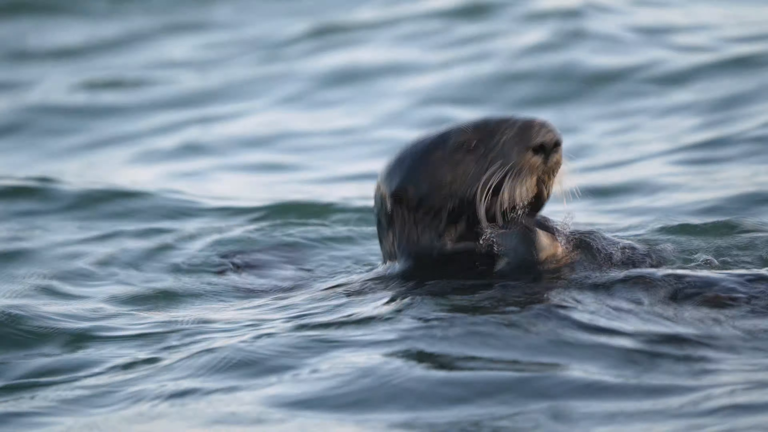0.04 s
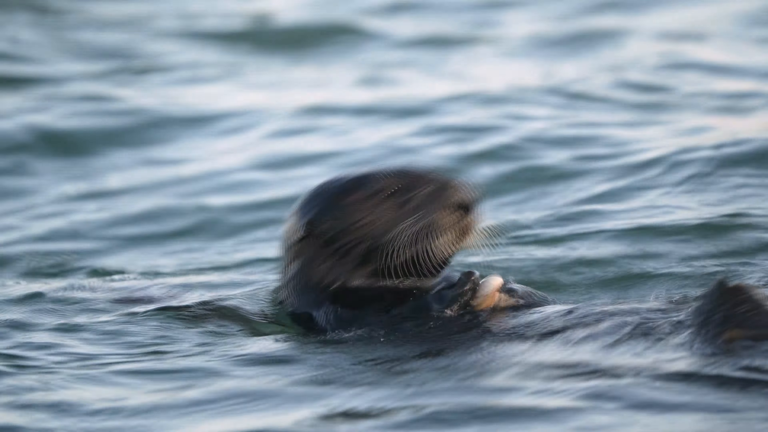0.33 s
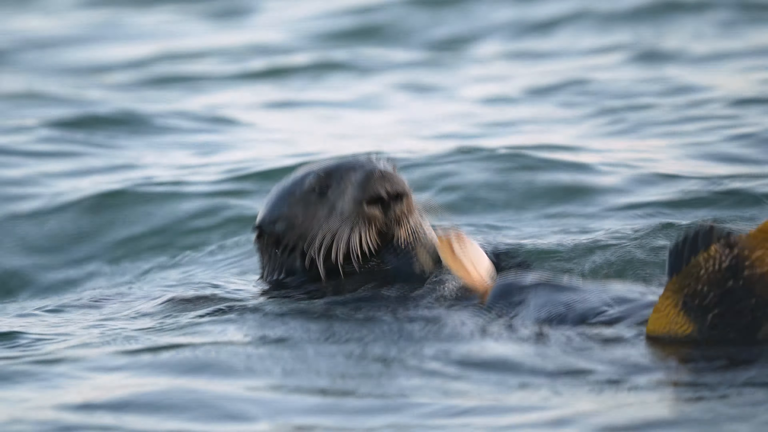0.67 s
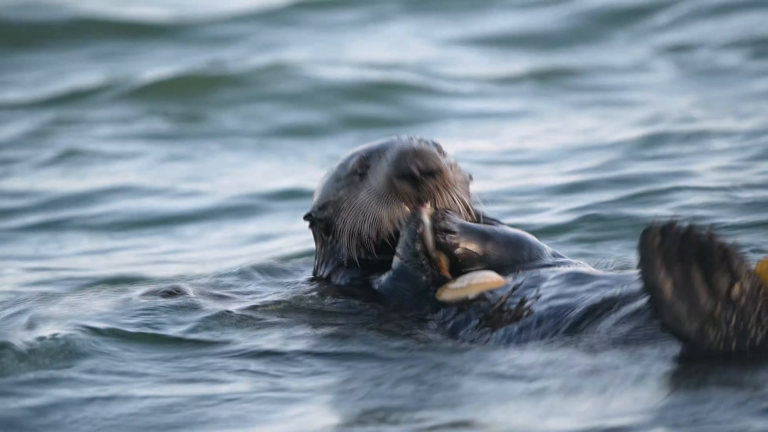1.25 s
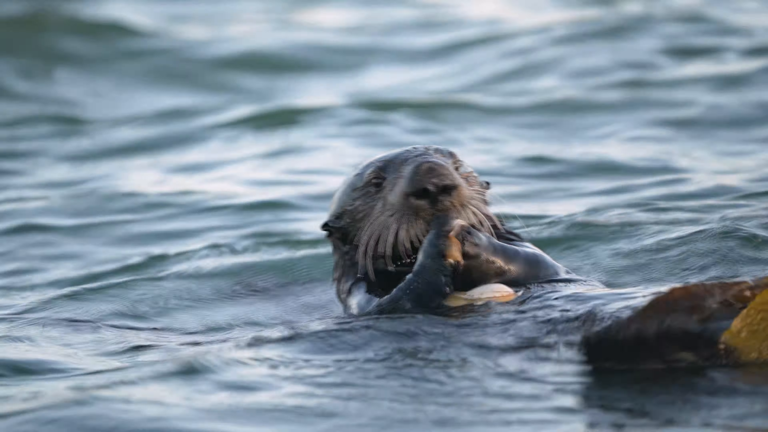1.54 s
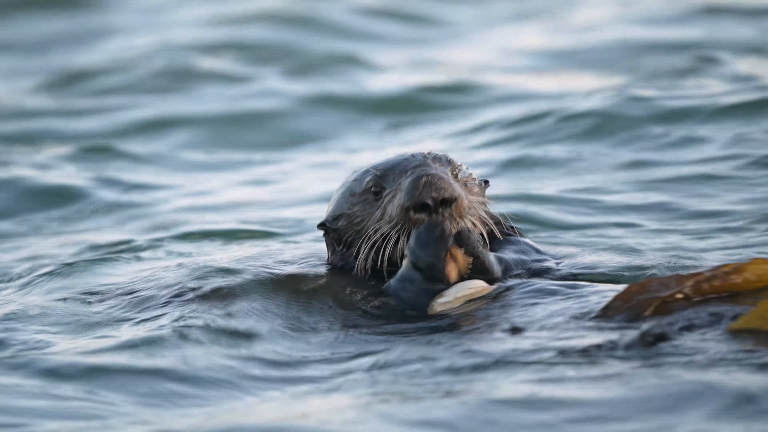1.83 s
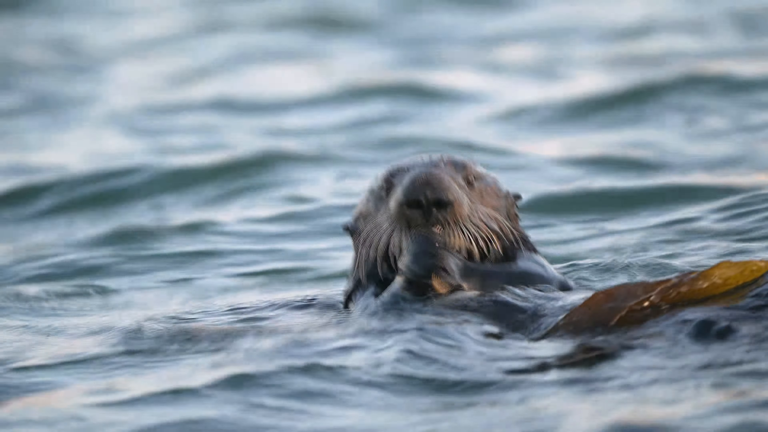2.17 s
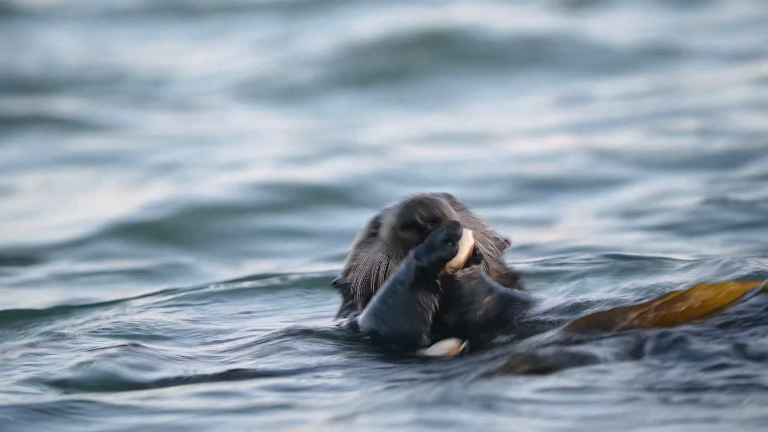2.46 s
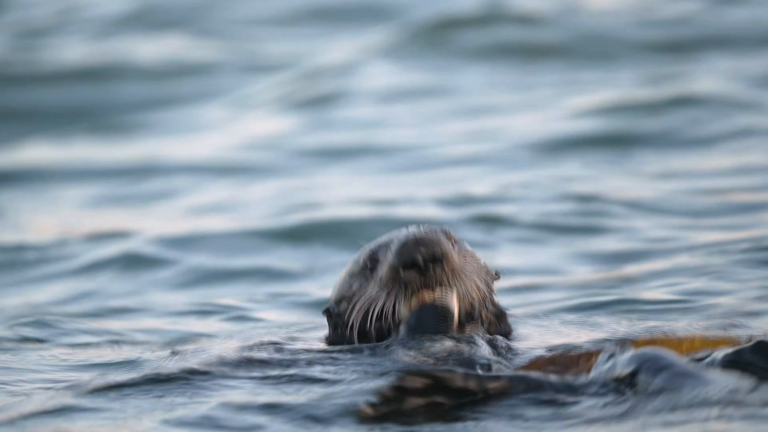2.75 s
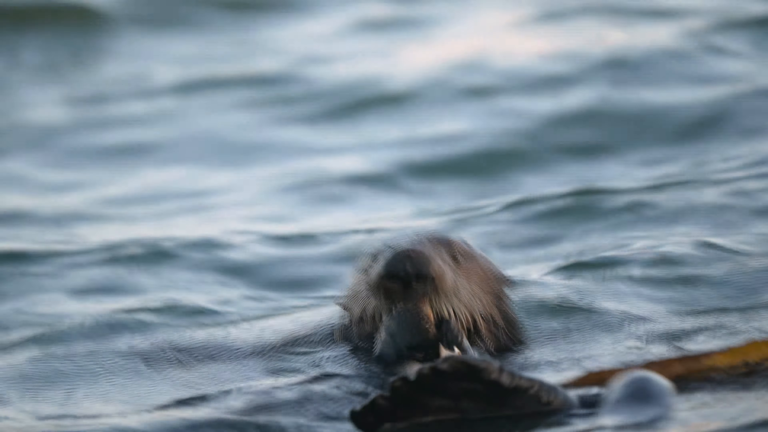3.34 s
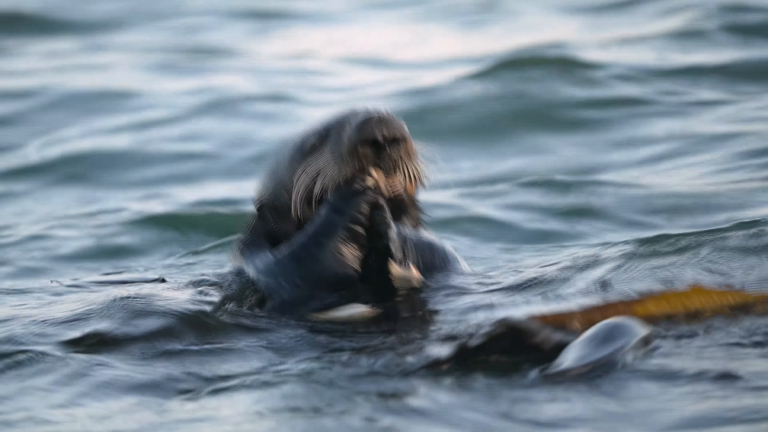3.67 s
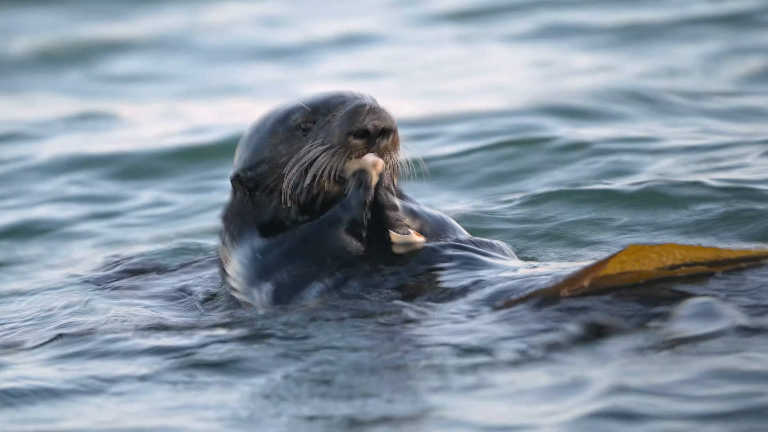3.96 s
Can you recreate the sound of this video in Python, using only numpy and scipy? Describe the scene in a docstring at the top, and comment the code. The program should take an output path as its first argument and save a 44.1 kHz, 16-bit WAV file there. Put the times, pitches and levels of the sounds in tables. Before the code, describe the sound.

Choppy bay water laps, thumps and gurgles just below the microphone, with a low wind rumble. Spray fizzes and drips, a sea otter snaps bits of shell now and then, and a small crest slaps near the end.

```python
"""A low rumble of wind on the microphone and churning water fades in, heard just above a choppy bay.
Wavelets lap with dull thumps as trapped air resonates, then wash over and gurgle; spray fizzes and
drips, its smaller bubbles ringing higher. A floating sea otter snaps bits of shell, each a crack with
a brief ring. Near the end a small crest breaks with a slap."""
import sys
import numpy as np
from scipy import signal
from scipy.fft import rfft, irfft
from scipy.io import wavfile

SR = 44100
rng = np.random.default_rng(int(sys.argv[2]) if len(sys.argv) > 2 else 0)


def unload_wav(signal):
    """Save mono or channel-first audio to the path in sys.argv[1] as 16-bit WAV at rate SR, clipped to [-1, 1]."""
    wavfile.write(
        sys.argv[1],
        SR,
        np.round(np.clip(np.atleast_2d(signal).T, -1, 1) * 32767).astype(np.int16),
    )


N = 176400
CUTOFF_HZ = 15900

# strength of the spray: (time [s], froth level [dB], fizz level [dB])
SPRAY_LEVELS = [(.08, -92, -110), (.14, -77, -82), (.2, -67.5, -81), (.28, -57.5, -63), (.55, -58, -62),
                (.82, -55.5, -59.5), (1.05, -51, -53.5), (1.3, -51.5, -51.5), (1.55, -46, -47.5),
                (1.85, -47, -49), (2.25, -48, -48), (2.55, -48, -48), (2.95, -50.5, -51), (3.4, -46.5, -47),
                (3.66, -42, -43), (3.85, -43, -44), (4.0, -43, -45)]


def from_db(db):
    """Amplitude grows tenfold for every 20 dB."""
    return 10 ** (np.asarray(db) / 20)


def rms_one(x):
    """Normalisation to unit mean power."""
    return x / np.sqrt(np.mean(x ** 2) + 1e-20)


def level(rows):
    """Amplitude envelopes, one for each level column, interpolated in decibels."""
    s, *columns = np.transpose(rows)
    return np.array([from_db(np.interp(np.arange(N) / SR, s, c)) for c in columns])


def per_bin(points):
    """A spectral curve interpolated over log frequency."""
    hz, value = np.transpose(points)
    return np.interp(np.log(np.arange(N // 2 + 1) * SR / N + 0.0013), np.log(hz), value)


def dying(t, t60):
    """Exponential damping: 60 dB in t60 seconds."""
    return np.exp(-np.log(1000) * t / t60)


def pan(db):
    """Direction as a level difference, left minus right."""
    return from_db(np.array([[db / 2], [-db / 2]]))


def add(out, s, sound):
    """Superposition of a sound that starts at s seconds."""
    i = int(s * SR)
    out[:, i:i + sound.shape[-1]] += sound[..., :N - i]


def drift(rate_hz):
    """Low-passed noise gives a slow fluctuation of unit rms."""
    step, settle = 40, 2000
    r = np.exp(-2 * np.pi * rate_hz * step / SR)
    slow = signal.lfilter([1], [1, -2 * r, r * r], rng.standard_normal(N // step + settle + 2))[settle:]
    return np.interp(np.arange(N) / step, np.arange(len(slow)), rms_one(slow))


def noise(flutter_db, rate_hz):
    """Two independent noises under a common amplitude modulation."""
    return rms_one(rng.standard_normal((2, N)) * from_db(flutter_db * np.clip(drift(rate_hz), -2, 2)))


def bubbles(low_hz, high_hz, per_s, cycles, spread_db, count=24):
    """Two swarms of randomly excited bubble resonators, each falling 60 dB in the given cycles."""
    out = np.zeros((2, N))
    for hz in np.geomspace(low_hz, min(high_hz, .45 * SR), count):
        chance = rng.random((2, N)) * SR * count / per_s
        born, clicks = chance < 1, np.zeros((2, N))
        clicks[born] = from_db(spread_db * np.minimum(-np.log(chance[born]), 4))
        r, w = from_db(-60 * hz / (cycles * SR)), 2 * np.pi * hz / SR
        out += hz * signal.lfilter([1, 0, -1], [1, -2 * r * np.cos(w), r * r], clicks + 1e-18)
    return rms_one(out)


def coloured(pair, spectrum):
    """Spectral shaping, then mid-side mixing into a partly coherent stereo field of unit rms."""
    # likeness of left and right: (frequency [Hz], correlation [0-1])
    coherence = [(60, 1), (300, 0.89), (450, 0.77), (680, 0.66), (1000, 0.74), (1700, 0.4), (2600, 0),
                 (4400, 0.47), (6000, 0.09), (15000, 0.27)]
    mid, side = rfft(pair) * from_db(per_bin(spectrum))
    alike = np.clip(per_bin(coherence), 0, 1)
    return rms_one(irfft(np.sqrt(1 + alike) * mid + np.sqrt(1 - alike) * side * [[1], [-1]], N))


def tick(t, hz, t60):
    """A brief impact is broadband: damped noise in about an octave above hz."""
    edges = np.minimum([hz, hz * 2.04], [.4 * SR, .45 * SR])
    band = signal.butter(2, edges, "band", fs=SR, output="sos")
    burst = signal.sosfilt(np.vstack([band, band]), rng.standard_normal((2, len(t))) * dying(t, t60))
    return burst / np.abs(burst).max()


def drop(hz):
    """A drop's impact ticks and entrains a tiny ringing bubble."""
    t, ring_cycles = np.arange(SR // 50) / SR, 40
    ring = from_db(-6) * dying(t, ring_cycles / hz) * np.sin(2 * np.pi * hz * t)
    sound = tick(t, hz, t60=.005) + ring
    return sound / np.abs(sound).max()


def wind():
    """Turbulent pressure on the microphone makes a deep rumble."""
    # gusts: (time [s], level [dB])
    gusts = [(0.08, -46), (0.2, -31.5), (1.13, -28.5), (1.55, -36), (1.6, -21.5), (1.64, -38), (1.66, -26),
             (1.96, -28), (2.23, -22), (2.32, -28.5), (3.39, -27), (3.42, -24), (3.49, -33), (3.52, -24.5),
             (3.88, -29), (4.0, -21)]
    # rumble: (frequency [Hz], relative level [dB])
    spectrum = [(15, -37), (28, -3.5), (45, -0.5), (70, -1), (100, -1), (140, -3.5), (250, -34), (600, -69)]
    return from_db(1.5) * level(gusts) * coloured(noise(flutter_db=0, rate_hz=23), spectrum)


def chop():
    """Turbulent churning, with glugs from the damped resonance of large bubbles."""
    # heaving of the water: (time [s], level [dB])
    heave = [(0.08, -45.5), (0.18, -30.5), (0.54, -32), (0.61, -26), (0.66, -29.5), (0.79, -27),
             (0.92, -26.5), (1.02, -26), (1.11, -30.5), (1.42, -34), (1.47, -31.5), (1.63, -33.5),
             (1.88, -23), (1.94, -39.5), (1.97, -28), (2.2, -22.5), (2.35, -25), (2.39, -32.5), (2.58, -32),
             (2.635, -22), (2.68, -29.5), (2.94, -26), (3.0, -27.5), (3.26, -25), (3.33, -35), (3.4, -26.5),
             (3.52, -32.5), (3.61, -24), (3.91, -29), (4.0, -22)]
    # churning: (frequency [Hz], relative level [dB])
    spectrum = [(50, -22), (95, -7), (135, 1), (200, -0.5), (300, -4.5), (420, -9), (600, -14),
                (1000, -18.5), (2000, -39.5), (5000, -75)]
    water = noise(flutter_db=0, rate_hz=44)
    water += 0.42 * bubbles(125, 585, per_s=240, cycles=8.1, spread_db=1, count=12)
    return from_db(2.5) * level(heave) * coloured(water, spectrum)


def wash():
    """Spilling crests entrain air, which gurgles at middle pitches."""
    # surges of the crests: (time [s], level [dB])
    surges = [(0.08, -83), (0.18, -53.5), (0.38, -45), (0.68, -49.5), (1.28, -41.5), (1.37, -37.5),
              (1.45, -39.5), (1.57, -40.5), (1.65, -39), (1.92, -40), (1.97, -41.5), (2.22, -34),
              (2.29, -40), (2.56, -31.5), (2.62, -39.5), (2.86, -36), (2.98, -42), (3.1, -36.5),
              (3.79, -29.5), (3.82, -25), (3.87, -25.5), (3.89, -34.5), (4.0, -30)]
    # spilling water: (frequency [Hz], relative level [dB])
    spectrum = [(200, -4), (450, -3), (650, -3.5), (850, 0.5), (1200, 0.5), (1500, -6), (1900, -15.5),
                (3500, -50), (8000, -66)]
    water = noise(flutter_db=3.5, rate_hz=24)
    water += 0.21 * bubbles(459, 1730, per_s=350, cycles=15.4, spread_db=0.5, count=32)
    return from_db(0.5) * level(surges) * coloured(water, spectrum)


def spray():
    """Smaller bubbles resonate higher: fine fizz lies above bursting froth, and both flicker together."""
    # small and finest bubbles: (frequency [Hz], relative level [dB])
    froth_spectrum = [(900, -4.5), (1600, -2.5), (2100, 1.5), (2800, 1), (3400, -4), (4200, -12.5),
                      (6000, -21), (12000, -39)]
    fizz_spectrum = [(2500, -12), (4200, -0.5), (5400, 3.5), (7500, -1), (9200, -4), (10300, -1),
                     (12400, -6), (15500, -4.5)]
    froth_gain, fizz_gain = level(SPRAY_LEVELS) * from_db(1.27 * drift(rate_hz=21))
    froth = noise(flutter_db=-1, rate_hz=15)
    froth += 0.28 * bubbles(1420, 4260, per_s=300, cycles=39, spread_db=3)
    fizz = noise(flutter_db=-0.5, rate_hz=55)
    fizz += 0.32 * bubbles(4070, 12500, per_s=3300, cycles=12, spread_db=10)
    return (from_db(5.5) * froth_gain * coloured(froth, froth_spectrum)
            + from_db(2.5) * fizz_gain * coloured(fizz, fizz_spectrum))


def patter():
    """Shot noise of stray droplets falling at random, stronger as the fizz grows."""
    per_s, low_hz, high_hz = 130, 3780, 11750
    out, fizz_gain = np.zeros((2, N)), level(SPRAY_LEVELS)[1]
    for when, size, pitch, side in rng.random(size=(int(per_s * N / SR), 4)):
        gain = fizz_gain[int(when * N)] * from_db(13 + 2.3 * min(-np.log(size), 3))
        hz = low_hz * (high_hz / low_hz) ** pitch
        add(out, when * N / SR, gain * pan(4 * (2 * side - 1)) * drop(hz))
    return out


def drips():
    """Single drops strike the surface as distinct transients."""
    # impacts: (time [s], level [dB], bubble frequency [Hz], pan [dB])
    impacts = [(.357, -40, 5100, -6), (0.9454, -28, 4900, 5), (1.2003, -32, 6490, -16),
               (1.5948, -30, 5300, 3), (1.722, -26, 4700, 2), (1.9685, -25, 4870, 1),
               (2.2977, -35, 5080, 9), (3.538, -27, 6200, 4), (3.698, -29, 5760, 5), (3.7938, -29, 6000, 5)]
    out = np.zeros((2, N))
    for s, db, hz, pan_db in impacts:
        add(out, s, from_db(db) * pan(pan_db) * drop(hz))
    return out


def sloshes():
    """A breaking wavelet entrains a cloud of bubbles whose crackle swells and dies."""
    # breaking wavelets: (time [s], level [dB], rise time [s])
    breakers = [(1.375, -46, 0.017), (1.545, -45, 0.027), (2.207, -38, 0.0089), (2.227, -38, 0.0061),
                (3.165, -39, 0.013), (3.384, -39.5, 0.017), (3.815, -35, 0.018), (3.862, -39, 0.027)]
    # bubble cloud: (frequency [Hz], relative level [dB])
    spectrum = [(500, -29), (1000, -9), (1700, 0.5), (2700, 6), (4000, 1), (6000, -1.5), (9000, -15),
                (15000, -10)]
    t, swell = np.arange(N) / SR, np.zeros(N)
    for s, db, rise_s in breakers:
        age = np.maximum(t - s, 0) / rise_s
        swell += from_db(db) * age * np.exp(1 - age)
    crackle = noise(flutter_db=9, rate_hz=110)
    crackle += 1.8 * bubbles(1220, 14000, per_s=1900, cycles=25, spread_db=1.5, count=20)
    return swell * coloured(crackle, spectrum)


def plops():
    """A bubble rings as a damped oscillator of rising pitch; four weaker ones follow as a gurgle."""
    # leading bubbles: (time [s], level [dB], starting frequency [Hz], pan [dB])
    leaders = [(0.841, -30.5, 1630, 0), (0.994, -32, 1870, -6), (1.371, -31, 1225, 0),
               (1.388, -28.5, 1980, -9), (1.405, -34, 2260, 15), (1.493, -32, 2850, -12),
               (1.505, -27, 1366, -7), (1.575, -24.5, 960, -6), (1.663, -34.5, 2080, -17),
               (1.955, -24.5, 963, 0), (1.992, -27, 2160, -11.5), (2.047, -30.5, 1760, -8),
               (2.113, -26, 1460, 3), (2.3213, -32, 2560, 8), (2.3905, -28, 4400, 2),
               (2.467, -29.5, 3860, -10), (3.177, -27, 1240, 4)]
    ring_cycles, rise_per_s = 48, 2.5
    gurgle_s, gurgle_db, gurgle_octaves = .028, -10, .35
    out, t = np.zeros((2, N)), np.arange(SR // 10) / SR
    for s, db, hz, pan_db in leaders:
        followers = [(gurgle_s * late, gurgle_db, hz * 2 ** (gurgle_octaves * (3 * high - 1)))
                     for late, high in rng.random(size=(4, 2))]
        for delay, weaker_db, pitch in [(0, 0, hz)] + followers:
            rising = np.sin(2 * np.pi * pitch * t * (1 + rise_per_s * t / 2))
            ring = dying(t, ring_cycles / pitch) * rising
            add(out, s + delay, from_db(db + weaker_db) * pan(pan_db) * ring)
    return out


def laps():
    """Air pockets under wavelets resonate with heavy damping: low ones thump, higher ones slap."""
    # air pockets: (time [s], level [dB], frequency [Hz])
    pockets = [(0.383, -17, 172), (0.601, -10.5, 167), (0.701, -9, 245), (.829, -14, 326),
               (.882, -17.5, 127), (0.984, -11, 278), (1.064, -14.5, 132), (1.457, -11.5, 179),
               (2.111, -15, 141), (2.156, -9, 234), (2.826, -13.5, 300), (2.941, -9, 184),
               (0.808, -11.5, 215), (2.853, -10.5, 136), (3.187, -14.5, 196), (3.403, -13.5, 205),
               (3.817, -13, 770), (3.824, -19, 905), (3.83, -10, 412), (3.834, -9.5, 410),
               (3.867, -5.5, 690)]
    damping_per_cycle = 2.424
    out, t = np.zeros((2, N)), np.arange(SR // 10) / SR
    for s, db, hz in pockets:
        age = damping_per_cycle * hz * t
        add(out, s, from_db(db) * age * np.exp(1 - age) * np.sin(2 * np.pi * hz * t))
    return out


def shell():
    """Brittle fracture in the otter's jaws: each crack briefly excites a shell fragment's modes."""
    # fractures: (time [s], level [dB], lowest mode [Hz], pan [dB])
    fractures = [(.7190, -36, 10400, 4.5), (.7344, -23, 5220, 5), (1.4507, -22.5, 5400, 1),
                 (2.3275, -28.5, 10300, 14), (2.356, -33, 5550, 8), (2.4562, -24.5, 7650, 10),
                 (3.4077, -24, 6900, 5), (3.531, -21, 6300, 5), (3.5608, -22, 7650, 6),
                 (3.634, -25.5, 5600, 7), (3.677, -26, 8200, -2)]
    # modes of a fragment: (frequency ratio [1], relative level [dB])
    modes = [(1, 5.5), (1.45, -1), (2.2, -10)]
    out, t = np.zeros((2, N)), np.arange(SR // 25) / SR
    for s, db, hz, pan_db in fractures:
        ring = sum(from_db(mode_db) * np.sin(2 * np.pi * hz * ratio * t)
                   for ratio, mode_db in modes if hz * ratio < CUTOFF_HZ)
        snap = from_db(-10.5) * ring * dying(t, t60=0.015) + tick(t, 0.85 * hz, t60=0.01)
        add(out, s, from_db(db) * pan(pan_db) * snap / np.abs(snap).max())
    return out


def scene():
    """Wind, water and shell superpose under a quick fade-in."""
    fade, = level([(0.066, -50), (0.076, 0)])
    background = wind() + chop() + wash() + spray()
    return fade * (background + sloshes() + laps() + plops() + drips() + shell() + patter())


def record(dry):
    """Two microphones differ in level and phase at each frequency; a steep low-pass cuts the top."""
    # level difference: (frequency [Hz], left minus right [dB])
    balance = [(80, .5), (300, -1.5), (600, -1.5), (1150, 4.5), (1600, -4.5), (2050, -3.5), (2600, 1),
               (3700, -5.5), (5600, 4), (7200, -5), (10000, 1.5), (15000, -1.5)]
    # phase difference: (frequency [Hz], lead of the left [rad])
    lead = [(20, 2.5), (50, -0.4), (100, 0.74), (300, 1.5), (560, 1.88), (850, 0.5), (1200, 0.5),
            (1700, 1.62), (2600, 4), (4500, 4.5), (8000, 1.5), (10500, -0.1), (13000, -1.5)]
    half = from_db(per_bin(balance) / 2) * np.exp(.5j * per_bin(lead))
    responses = irfft(np.array([half, 1 / half]), N)
    taps = np.roll(responses, 512, axis=1)[:, :1025] * np.hanning(1025)
    heard = signal.fftconvolve(dry, taps, "same", axes=1)
    return signal.sosfilt(signal.ellip(12, .1, 80, CUTOFF_HZ - 150, fs=SR, output="sos"), heard)


dry = scene()
out = record(dry)
unload_wav(out)
```